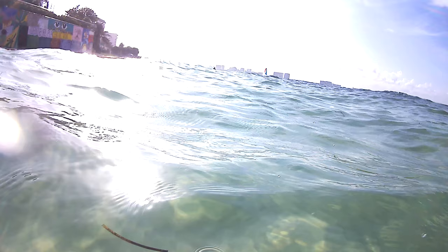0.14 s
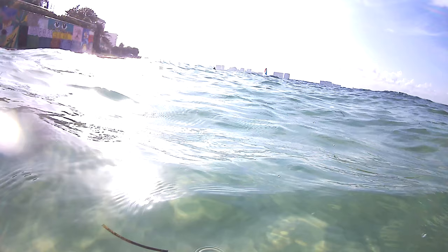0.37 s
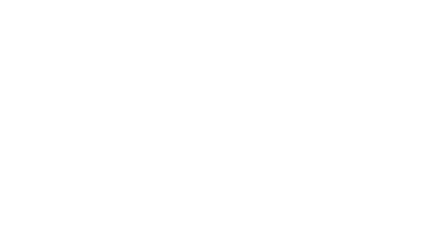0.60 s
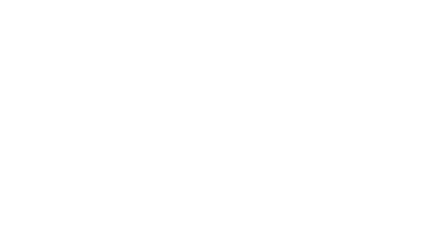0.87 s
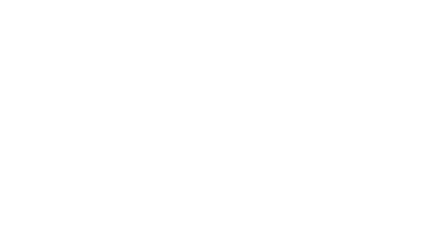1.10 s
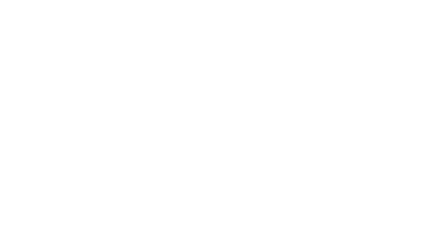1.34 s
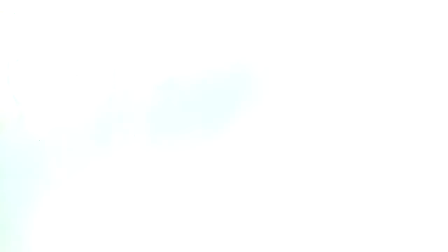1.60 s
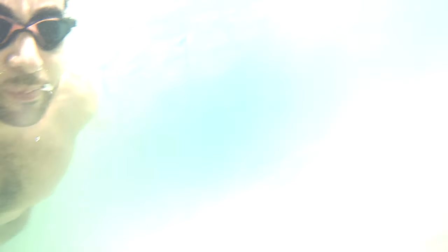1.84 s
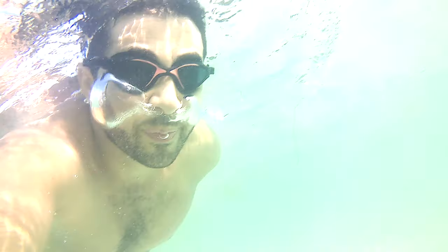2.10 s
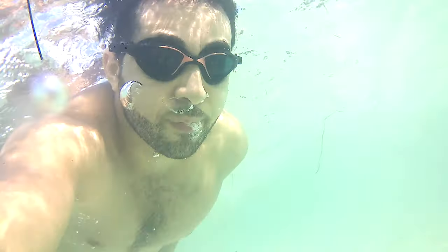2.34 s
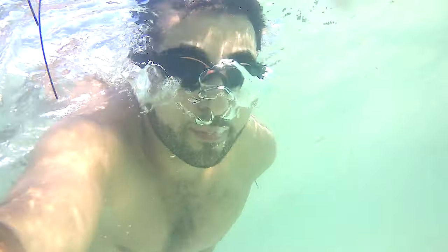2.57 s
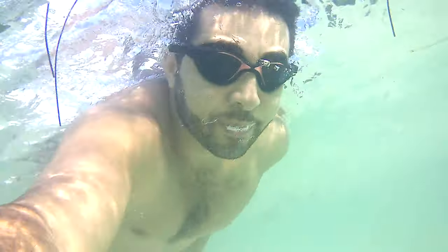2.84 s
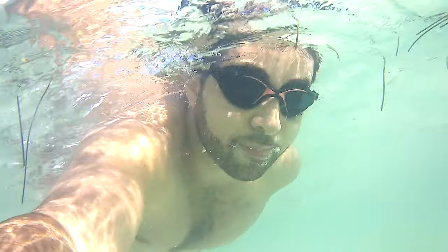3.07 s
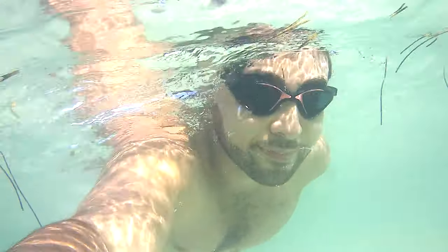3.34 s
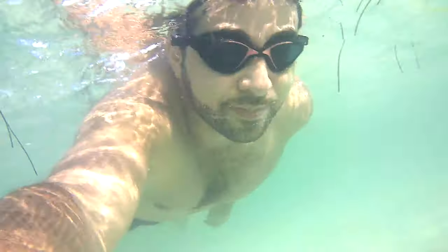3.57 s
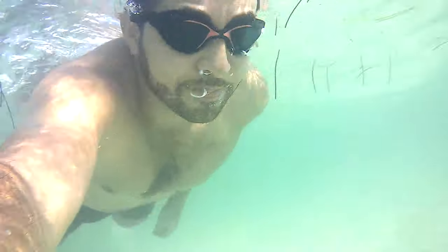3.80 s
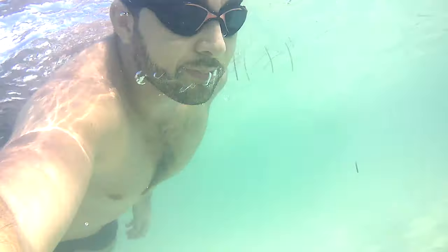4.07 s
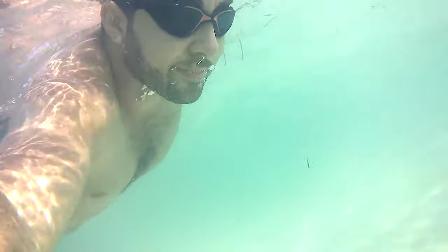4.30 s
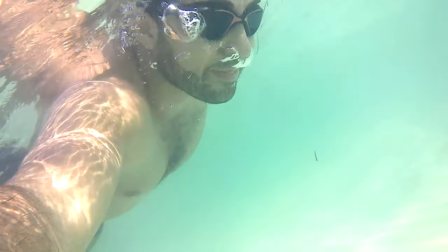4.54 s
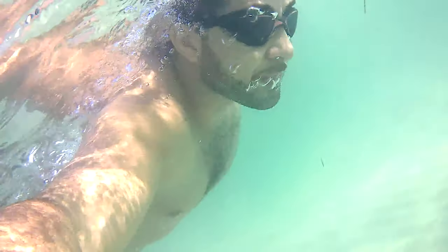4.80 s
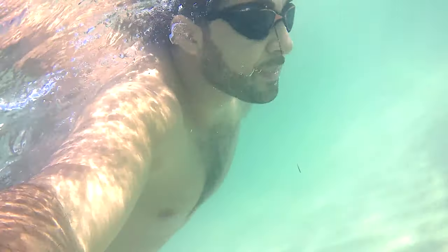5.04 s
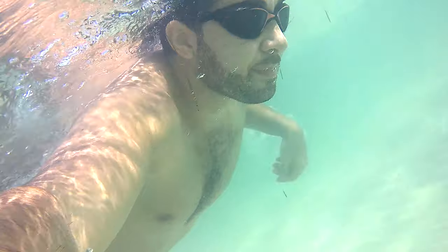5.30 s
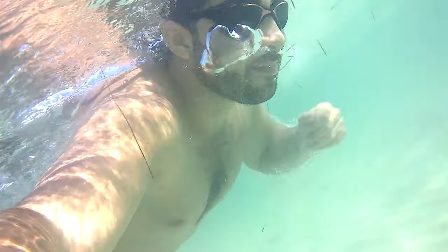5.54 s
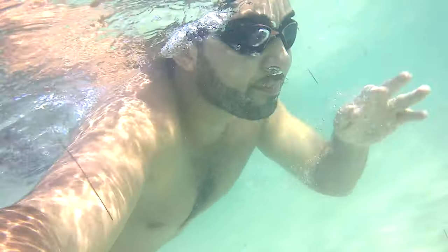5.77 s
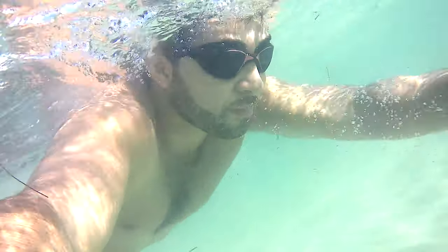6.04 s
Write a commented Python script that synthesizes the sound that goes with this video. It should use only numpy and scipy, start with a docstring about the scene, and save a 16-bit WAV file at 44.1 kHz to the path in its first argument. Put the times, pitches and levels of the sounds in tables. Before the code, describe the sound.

Bubbly splash as a camera dips under the sea, then a violent distorted buzzing surge just after one second, followed by quiet muffled gurgling and scattered plops.

```python
"""A small camera in a sealed housing dips under the sea surface and is carried along by a swimmer.
First, showers of bubbles ring as rising sines over sloshing, gurgling and fizzing filtered noise.
Big bubbles then thump as slow decaying sines, and just after one second a violent surge makes
the housing buzz on two gliding tones, far into overload. Afterwards the water runs on with
scattered bubbles, a faint shower past the middle and a last burst of bubbles before it quiets."""
import sys
import numpy as np
from scipy import signal
from scipy.io import wavfile
from scipy.ndimage import uniform_filter1d

SR = 44100
rng = np.random.default_rng(int(sys.argv[2]) if len(sys.argv) > 2 else 0)


def generate_wav(sig):
    """Save sig (samples, or channels by samples) to the path in sys.argv[1] as 16-bit PCM at SR."""
    pcm = np.round(np.clip(np.atleast_2d(sig).T, -1, 1) * 32767).astype(np.int16)
    wavfile.write(sys.argv[1], SR, pcm)


def ratio_of_db(decibels):
    """Turn decibels (scalar or array-like) into linear amplitude factors; 0 dB maps to 1."""
    return 10 ** (np.asarray(decibels, float) / 20)


N = 271215  # length in samples

# Resonances of the housing, low to high.
# Each row: frequency in Hz, width of a single pass in Hz, relative level in dB.
HOUSING_MODES = [(330, 320, -7), (460, 242, 10.5), (600, 250, 6.5), (699.5, 66, 3.5), (1200, 200, 9),
                 (1418, 140, 4), (2464, 940, -10.5), (2990, 840, -19)]


def level(x):
    """Scale to unit rms."""
    return x / np.sqrt(np.mean(x ** 2))


def band(x, lo_hz, hi_hz, order=2):
    """Band-pass."""
    return signal.sosfilt(signal.butter(order, [lo_hz, hi_hz], "band", fs=SR, output="sos"), x)


def resonate(x, hz, width):
    """A resonance applied twice, so that the valleys beside it stay dark."""
    peak = signal.iirpeak(hz, hz / width, SR)
    once = signal.lfilter(*peak, x)
    return signal.lfilter(*peak, once)


def housing(x, modes):
    """The shell rings at its resonances and has a dead spot near one kilohertz."""
    rung = sum(ratio_of_db(db) * resonate(x, hz, width) / np.sqrt(width) for hz, width, db in modes)
    dead_spot = signal.iirnotch(990., 3.5, SR)
    return level(signal.lfilter(*dead_spot, rung))


def curves(rows):
    """Columns of a table after its time column, one value per sample."""
    s, *columns = np.transpose(rows)
    return [np.interp(np.arange(N) / SR, s, c) for c in columns]


def walk(rate):
    """Random levels held 1 / rate s and slewed twice."""
    k = int(SR / rate)
    steps = np.repeat(rng.standard_normal(N // k + 1), k)
    return 1.5 * uniform_filter1d(uniform_filter1d(steps, k), k)[:N]


def grains(rate, spread_db):
    """Soft taps of noise at random moments, rate per second; a few are larger than the rest."""
    hit = rng.random(N) < rate / SR
    size_db = spread_db * np.minimum(rng.exponential(size=N), 2.8)
    t = np.arange(600) / SR
    tap = np.exp(-t / .006) * (1 - np.exp(-t / 0.0016))
    return signal.fftconvolve(hit * ratio_of_db(size_db), tap)[:N] * rng.standard_normal(N)


def fizz(patchy, rate, spread_db):
    """Tiny bubbles over a smooth rush."""
    return patchy * (level(grains(rate, spread_db)) + 0.9 * rng.standard_normal(N))


def add(out, s, sound):
    """Mix a sound in at time s."""
    i = int(s * SR)
    out[i:i + len(sound)] += sound[:N - i]


def ring(hz, t60, glide, rise_cycles, rough=0):
    """A bubble: a sine that swells quickly, wobbles, and dies away while its pitch creeps up."""
    t = np.arange(int(t60 * SR)) / SR
    swell = (1 - np.exp(-t * hz / rise_cycles)) ** 2
    shape = swell * np.exp(-np.log(1000) * (t / t60) ** 1.064)
    noise = rng.standard_normal(8000)
    wobble = level(uniform_filter1d(uniform_filter1d(noise, size=36), size=36))
    tone = np.sin(2 * np.pi * hz * t * (1 + glide * t / t60))
    return shape / shape.max() * (1 + rough * np.resize(wobble, len(t))) * tone


def surf(swing_db):
    """A faint even hiss of far surf never stops and draws slowly nearer."""
    start_db, rise_db_per_s = -64, 1.72
    hiss_db = start_db + rise_db_per_s * np.arange(N) / SR + 0.34 * swing_db
    return ratio_of_db(hiss_db) * housing(fizz(1, 300.0, 6.3), HOUSING_MODES[6:])


def slosh(sway_db):
    """Slow pressure swings on the port: noise of a few cycles per second."""
    return ratio_of_db(sway_db) * level(band(rng.standard_normal(N), 4.33, 21.24))


def gurgle(swing_db):
    """Low churning water, with the resonance of the air space behind the port."""
    start_db, fade_db_per_s = -39, 1
    follows = 0.46  # share of the flow's swings that it takes over
    pocket_db, pocket_fade_db_per_s = 0, 1  # the air behind the port is slowly squeezed out
    t = np.arange(N) / SR
    churn = level(grains(54.0, 11.0)) + 0.57 * rng.standard_normal(N)
    pocket = ratio_of_db(pocket_db - pocket_fade_db_per_s * t) * level(resonate(churn, 144.5, 50.0))
    gurgle_db = start_db - fade_db_per_s * t + follows * swing_db + 2.4 * walk(9.)
    return ratio_of_db(gurgle_db) * (level(band(churn, 61.0, 330.0)) + pocket)


def fizz_bursts(flow_db, swing_db):
    """Fizz rings the housing in patches that lift all its resonances together."""
    treble_db, treble_follows = -48, 0.94
    patchy = ratio_of_db(1.92 * walk(14.))
    flicker = ratio_of_db(2.5 * walk(25.))  # the treble alone also flickers
    body = housing(fizz(patchy, 72.0, 4.0), HOUSING_MODES[:4])
    treble = housing(fizz(patchy * flicker, 210.0, 4.6), HOUSING_MODES[4:])
    return ratio_of_db(flow_db) * body + ratio_of_db(treble_db + treble_follows * swing_db) * treble


def water():
    """Surf, gurgle and fizz follow one moving flow of water; slosh follows the sway."""
    # Each row: time in seconds, flow level in dB, sway level in dB.
    flow = [(0, -31, -20.5), (.27, -27, -14.5), (.44, -38, -18.5), (.62, -40, -13), (.8, -34.5, -25),
            (.96, -33, -22), (1.06, -32, -27.5), (1.42, -36, -16.5), (1.62, -37, -18), (1.85, -36.5, -18),
            (2.3, -35, -26.5), (2.55, -32.5, -28), (2.8, -37.5, -20.5), (3.17, -43.5, -26),
            (3.45, -44, -18.5), (3.75, -32.5, -25), (4.0, -33.5, -20), (4.3, -39.5, -22), (4.6, -35.5, -26),
            (4.66, -35, -27.5), (4.76, -29, -16), (4.85, -40, -27), (5.1, -33, -23.5), (5.28, -35.5, -31.5),
            (5.5, -39, -21), (5.67, -39.5, -29), (5.8, -42.5, -23), (6.15, -46.5, -26.5)]
    flow_db, sway_db = curves(flow)
    swing_db = flow_db + 37  # swings of the flow about -37 dB
    return surf(swing_db) + slosh(sway_db) + gurgle(swing_db) + fizz_bursts(flow_db, swing_db)


def showers():
    """Clusters of drops of all sizes, each dying within 35 cycles, in a wash of spray."""
    # Each row: start in seconds, end in seconds, drops per second (at most 80 drops per shower), level in dB,
    # lowest pitch in Hz, highest pitch in Hz.
    clusters = [(.05, 0.244, 490, -20, 504, 3900), (0.086, 0.221, 190, -22.5, 1900, 3520),
                (0.256, 0.449, 128, -33.5, 505, 2580), (3.59, 3.703, 280, -38, 1196, 3200),
                (5.384, 5.44, 83, -24, 600, 2290)]
    wash_db = -14  # spray between the drops of a shower
    out, t = np.zeros(N), np.arange(N) / SR
    spray = level(grains(600.0, 12.0))
    for start, end, rate, db, low_hz, high_hz in clusters:
        count = int(rate * (end - start))
        for when, height, softness in rng.random((80, 3))[:count]:
            hz = low_hz * (high_hz / low_hz) ** height
            drop_db = db - 7.1 * softness - 19 * height  # higher drops are quieter
            drop = ring(hz, 35 / hz, glide=0.035, rise_cycles=0.25, rough=0.5)
            add(out, start + when * (end - start), ratio_of_db(drop_db) * drop)
        swell = np.sin(np.pi * np.clip((t - start) / (end - start), 0, 1)) ** .5
        out += ratio_of_db(db + wash_db) * swell * level(band(spray, low_hz, high_hz, order=1))
    return out


def plops():
    """Small plops, each of one or more short rings starting almost together; higher is rougher."""
    # One ring a row: start in seconds, level in dB, starting pitch in Hz, time to -60 dB in seconds.
    plop_rings = [(0.053, -20, 687, 0.084), (0.0548, -15.5, 1276, 0.035), (0.094, -10.5, 440, 0.027),
                  (0.0935, -10.5, 2445, 0.017), (0.1, -11, 600, 0.034), (0.101, -18, 2077, 0.06),
                  (0.127, -12.5, 735, 0.11), (0.127, -16.5, 3080, 0.046), (0.1285, -17.5, 2400, 0.026),
                  (0.1458, -12.5, 1464, 0.034), (0.183, -11.5, 1320, 0.031), (0.183, -16, 3230, 0.018),
                  (0.198, -3.5, 758, 0.079), (0.1972, -7.5, 1200, 0.048), (0.3223, -34.5, 3650, 0.02),
                  (0.3608, -24, 1370, 0.067), (0.4245, -21.5, 1314, 0.055), (0.433, -25.5, 443, 0.087),
                  (0.756, -17.5, 777, 0.023), (0.888, -18.5, 470, 0.04), (1.387, 1.5, 479, 0.018),
                  (1.448, -24.5, 560, 0.026), (1.4687, -26, 1476, 0.052), (1.508, -19, 523, 0.039),
                  (1.597, -11, 460, 0.013), (1.739, -34.5, 2380, 0.025), (1.888, -27, 1970, 0.023),
                  (1.8871, -24.5, 3070, 0.015), (2.011, -22, 383, 0.016), (2.0926, -35.5, 2330, 0.022),
                  (2.164, -22.5, 455, 0.057), (2.2563, -37, 2670, 0.025), (2.359, -14.5, 440, 0.028),
                  (2.36, -20.5, 729, 0.047), (2.392, -24.5, 734, 0.11), (2.5013, -25.5, 1200, 0.014),
                  (2.62, -26, 410, 0.12), (2.6186, -31.5, 1564, 0.044), (3.6236, -16.5, 1225, 0.014),
                  (3.6491, -13.5, 1373, 0.027), (3.6512, -13, 2280, 0.014), (3.6655, -18, 1470, 0.0094),
                  (3.705, -37, 2890, 0.032), (3.713, -24.5, 517, 0.091), (3.756, -13, 477, 0.013),
                  (3.765, -20.5, 458, 0.044), (3.777, -17, 372, 0.022), (3.789, -16.5, 400, 0.017),
                  (3.897, -20, 715, 0.058), (4.375, -26, 673, 0.03), (4.577, -31.5, 1160, 0.073),
                  (4.688, -29, 730, 0.086), (5.384, -9, 730, 0.031), (5.3832, -26, 1220, 0.028),
                  (5.4108, -12, 1170, 0.034), (5.4098, 0.5, 692, 0.021), (5.459, -22.5, 438, 0.068),
                  (5.459, -30, 2900, 0.018), (5.459, -32, 1960, 0.017), (5.461, -19.5, 720, 0.022),
                  (5.796, -26.5, 790, 0.034)]
    rise_s = 0.00072  # added to a rise of 0.6 cycles
    out = np.zeros(N)
    for s, db, hz, t60 in plop_rings:
        rough = min(hz / 4100.0, 1)
        add(out, s, ratio_of_db(db) * ring(hz, t60, glide=0.0062, rise_cycles=0.6 + rise_s * hz, rough=rough))
    return out


def thumps():
    """Big bubbles break away and throb a few slow cycles."""
    # Each row: start in seconds, level in dB, starting pitch in Hz, ring time to -60 dB in seconds.
    big_bubbles = [(0.667, -14, 48.6, 0.12), (0.775, -12, 46, 0.072), (0.94, -12.5, 52.7, 0.22),
                   (1.359, 3.5, 50.8, 0.18), (1.51, -8, 72.9, 0.26), (1.597, -7.5, 39.3, 0.17),
                   (2.131, -6.5, 68, 0.24), (2.233, -21.5, 260, 0.067), (2.336, -16.5, 113, 0.16),
                   (2.41, -15, 154, 0.069), (2.519, -16, 94, 0.1), (2.839, -14.5, 43.7, 0.12),
                   (4.371, -11, 133.7, 0.15), (4.56, -22.5, 237, 0.057), (4.974, -20.5, 49.3, 0.12),
                   (5.418, -15.5, 121.6, 0.29), (5.545, -16.5, 65.4, 0.24)]
    out = np.zeros(N)
    for s, db, hz, t60 in big_bubbles:
        add(out, s, ratio_of_db(db) * ring(hz, t60, glide=.04, rise_cycles=0.09, rough=0.08))
    return out


def gush(start, hold, release_db_per_s):
    """Gain of one gush: quick attack that is full at its start time, hold, steady release."""
    attack_s = 0.0047
    t = np.arange(N) / SR - start
    attack = np.clip(1 + t / attack_s, 0, 1) ** 2
    return attack * ratio_of_db(-release_db_per_s * np.maximum(t - hold, 0))


def surge():
    """Rushing water drives two resonances of the housing into an unsteady buzz, with spray on top."""
    # Each row: time of full strength in seconds, hold in seconds, low buzz in dB, high buzz in dB.
    gushes = [(1.075, 0.023, -2.5, -16), (1.09, 0.019, -4.5, -4), (1.113, 0.072, 3, 12),
              (1.175, 0.034, 16, 13), (1.235, 0.025, 19.5, 8.5), (1.289, 0.022, 18, 11),
              (1.325, 0.025, 6, -16)]
    low_release, high_release = 454, 698.5  # dB per second
    spray_db = -9.5  # under the high buzz
    t = np.clip(np.arange(N) / SR - gushes[0][0], 0, 1)
    low_hz = 131.84 + 60 * t  # climbs for a second from the first gush on
    high_hz = 458.2 + (483.6 - 458.2) * np.exp(-t / 0.0597)  # starts sharp and settles
    low_gain = np.max([ratio_of_db(db) * gush(s, hold, low_release) for s, hold, db, _ in gushes], axis=0)
    high_gain = np.max([ratio_of_db(db) * gush(s, hold, high_release) for s, hold, _, db in gushes], axis=0)
    # every cycle is pushed a little early or late by the turbulence
    low_phase = 2 * np.pi * np.cumsum(low_hz) / SR + 0.44 * walk(260.)
    high_phase = 2 * np.pi * np.cumsum(high_hz) / SR + 0.56 * walk(420.)
    low = ratio_of_db(1.2 * walk(70.)) * np.sin(low_phase)
    high = ratio_of_db(4.3 * walk(130.)) * np.sin(high_phase)
    noise = rng.standard_normal(N)
    # the harder the water rushes, the brighter the spray
    bright = 0.24 * high_gain ** 0.54 * level(band(noise, 360.0, 3600.0))
    spray = level(band(noise, 95.0, 430.0)) + bright
    # the low buzz throws up a fine mist of its own
    mist = ratio_of_db(-32) * low_gain ** .4 * level(band(noise, 700., 3000.0))
    return low_gain * (low + mist) + high_gain * (high + ratio_of_db(spray_db) * spray)


def scene():
    """All sources at the one microphone port."""
    return (water() + showers() + plops() + thumps() + surge())[None]


def roll_off(x):
    """The treble ends steeply here."""
    return signal.sosfilt(signal.butter(12, 15870, fs=SR, output="sos"), x)


def record(dry):
    """The treble is muffled steeply above about 4 kHz; overload squares off and crackles the loudest swings."""
    muffle_hz, clip = 3850, 0.7
    crackle_depth = 0.09  # scales how far the overloaded tops cave in
    muffled = signal.sosfilt(signal.butter(8, muffle_hz, fs=SR, output="sos"), dry)
    overload = np.clip(np.abs(muffled) / clip - 1.3, 0, 1)
    crackle = crackle_depth * np.maximum(walk(5000.) - 0.4, 0) * overload
    squared = np.clip(muffled, -clip, clip) * (1 - crackle)
    # a last smoothing lets a little of the sharp edges through
    leak = signal.sosfilt(signal.butter(1, 9000., fs=SR, output="sos"), squared)
    smooth = signal.sosfilt(signal.butter(5, 3700., fs=SR, output="sos"), squared)
    return roll_off(0.76 * smooth + 0.18 * leak)


dry = scene()
out = record(dry)
generate_wav(out)
```